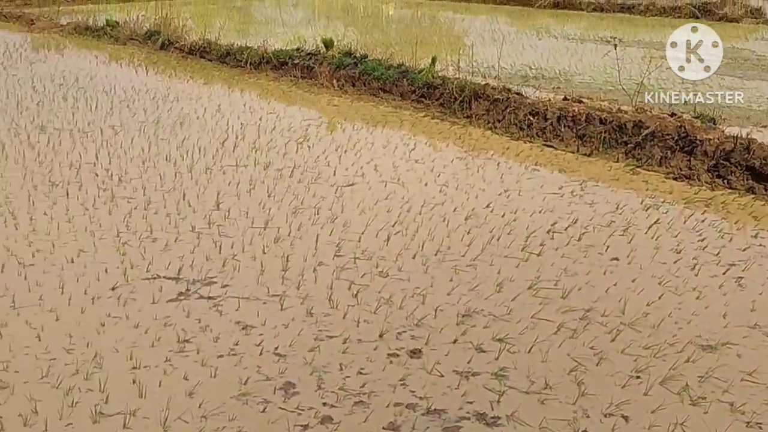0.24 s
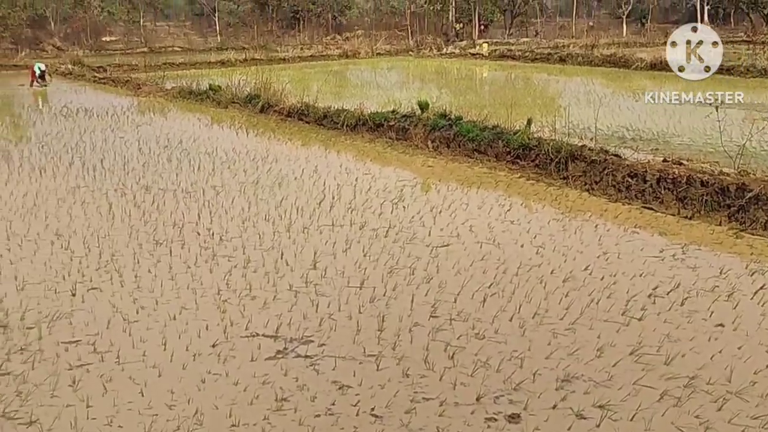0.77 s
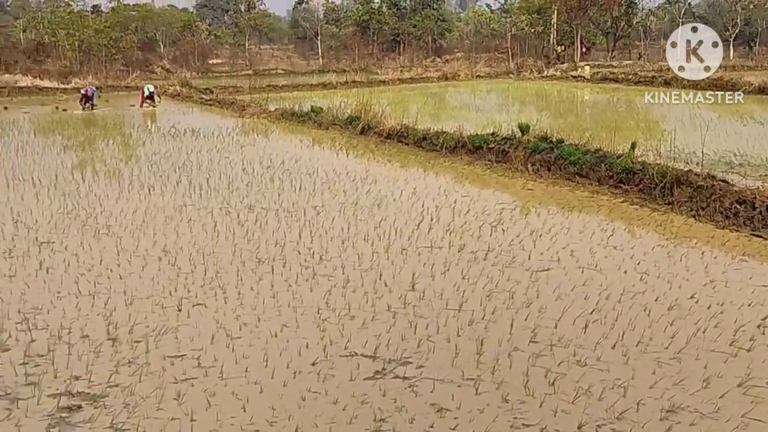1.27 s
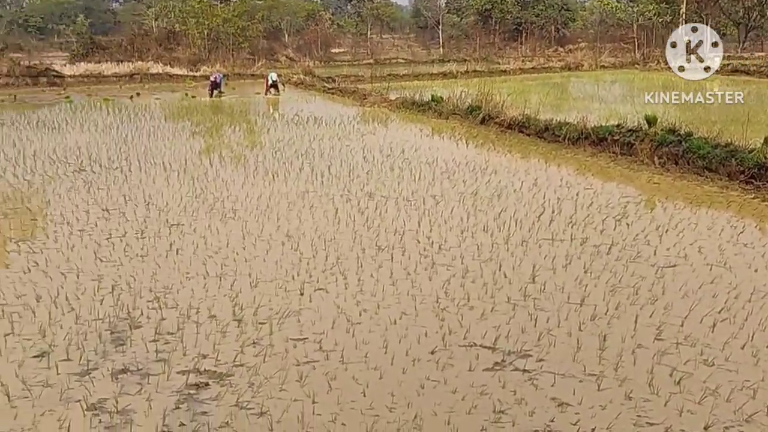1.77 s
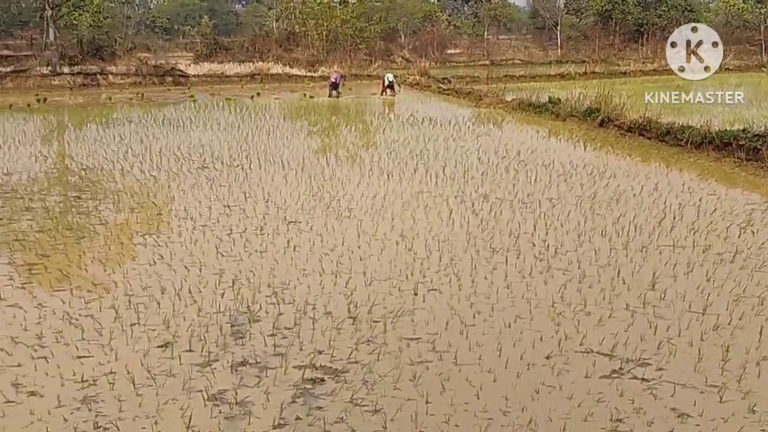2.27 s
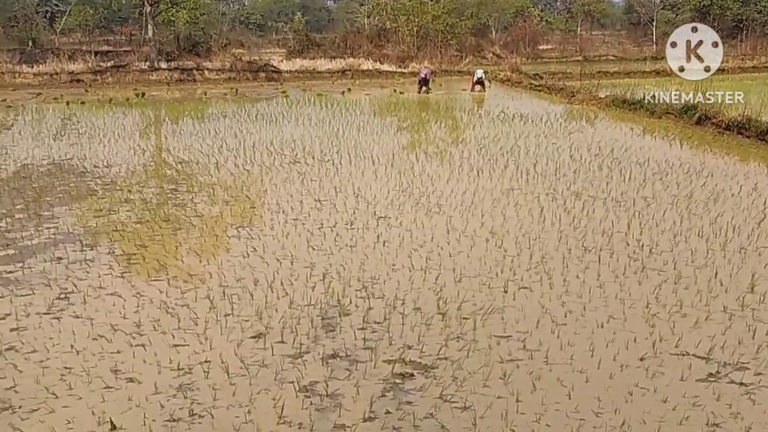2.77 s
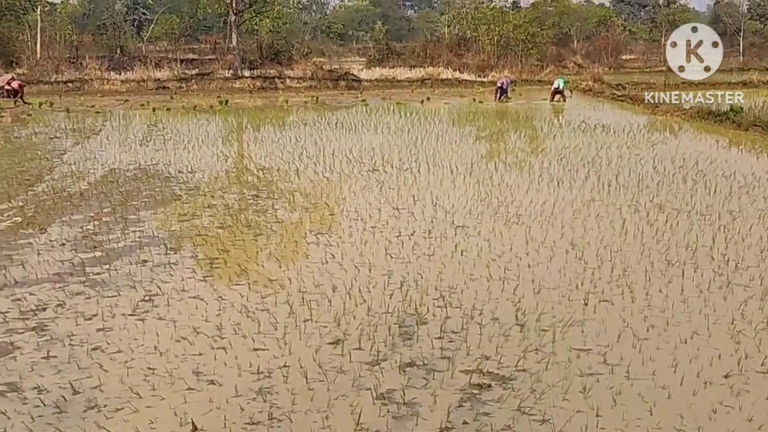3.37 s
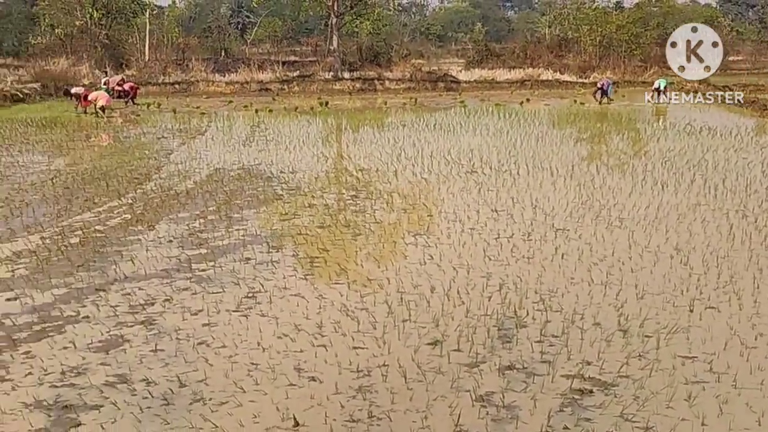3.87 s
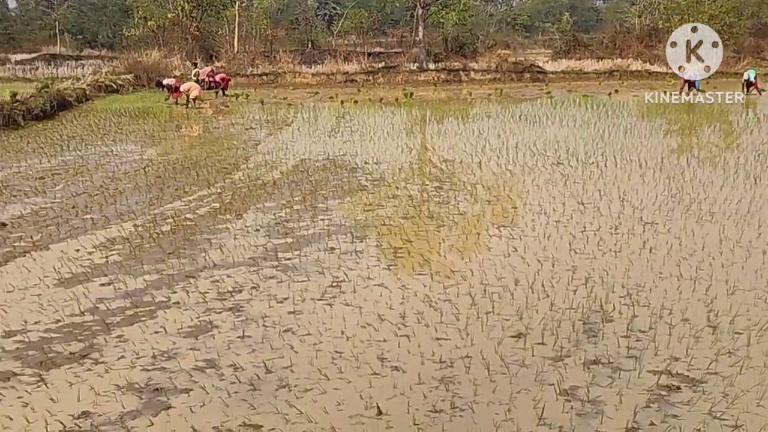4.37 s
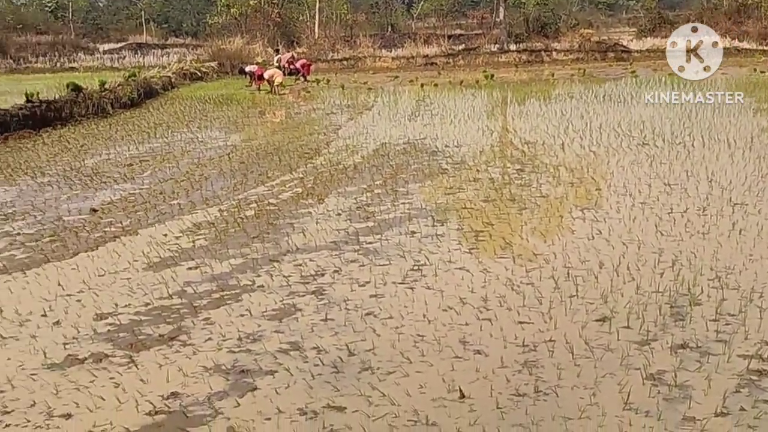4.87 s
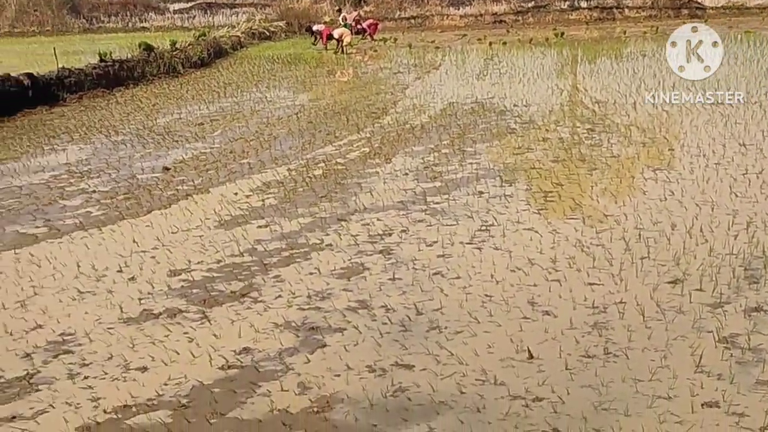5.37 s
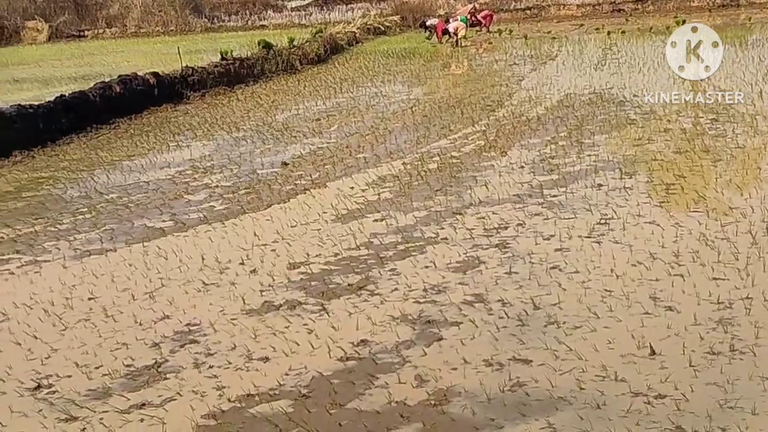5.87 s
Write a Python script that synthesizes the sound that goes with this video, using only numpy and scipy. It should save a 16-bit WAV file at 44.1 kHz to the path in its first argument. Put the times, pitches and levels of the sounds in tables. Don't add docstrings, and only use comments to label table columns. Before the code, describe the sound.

Across a flooded field a small single-cylinder engine putters steadily, about fourteen beats a second, dull and distant at first, then gradually fuller and brighter with metallic clatter towards the right. Light wind buffets and airy hiss surround it. Fingers tick on the handheld stereo phone, most sharply near three seconds; a rough bird note comes mid-way, then a stick snaps close on the right just after four seconds.

```python
import sys
import numpy as np
from scipy import signal
from scipy.fft import next_fast_len
from scipy.io import wavfile
from scipy.ndimage import uniform_filter1d

SR = 44100
rng = np.random.default_rng(int(sys.argv[2]) if len(sys.argv) > 2 else 0)


def store_pcm(level_fs):
    pcm = np.round(np.clip(level_fs, -1, 1) * 32767).astype(np.int16)
    wavfile.write(sys.argv[1], SR, np.atleast_2d(pcm).T)


def boost(x):
    u = np.asarray(x, float) / 20
    return 10 ** u


N = 270333
T = np.arange(N) / SR

# (time [s], thump level [dB])
TURN = [(0, -58), (.4, -53.5), (1.2, -51), (2, -49.5), (3.4, -49.5), (3.8, -48), (4.6, -48), (5.4, -49.5),
        (5.8, -48), (6.13, -48)]
# (time [s], facing [0-1])
FACING = [(0, 0), (1, 0.11), (1.6, 0.3), (2.2, 0.54), (2.8, 0.67), (3.5, 0.66), (4.3, 0.94), (5, 1),
          (6.13, 0.99)]


def evened(x):
    return x / np.sqrt(np.mean(x ** 2) + 1e-20)


def columns(rows, t):
    s, *values = np.transpose(rows)
    return [np.interp(t, s, v) for v in values]


def on_log(rows, hz):
    return columns([(np.log(f), *v) for f, *v in rows], np.log(hz + 1e-3))


def add(mix, s, sound):
    part = mix[..., round(s * SR):][..., :sound.shape[-1]]
    part += sound[..., :part.shape[-1]]


def filtered(x, order, hz, kind):
    return signal.sosfilt(signal.butter(order, hz, kind, fs=SR, output="sos"), x)


def resonate(x, hz, width):
    return signal.lfilter(*signal.iirpeak(hz, hz / width, SR), x)


def resonate_twice(x, hz, width, second_width):
    return resonate(resonate(x, hz, width), hz, second_width)


def burst(s, rise, fall):
    s = np.maximum(s, 0)
    return (1 - np.exp(-s / rise)) * np.exp(-s / fall)


def bump(s, half):
    return np.exp(-((T - s) / half) ** 2)


def waver(n, size):
    return evened(uniform_filter1d(uniform_filter1d(rng.standard_normal(n), size), size))


def noise(spectrum, patchy_db, size):
    a, b, patches = rng.standard_normal((3, 2, N // 128 + 5, 257)).swapaxes(2, 3)
    patches = uniform_filter1d(patches, size, axis=1)
    patches = evened(uniform_filter1d(patches, 20, axis=2))
    colour_db = on_log(spectrum, np.fft.rfftfreq(512, 1 / SR))[0][:, None]
    z = (a + 1j * b) * boost(colour_db + patchy_db * patches)
    return evened(signal.istft(z, nperseg=512, noverlap=384)[1][:, :N])


def knocks(rows, rise, grain):
    out, t = np.zeros(N), T[:8000]
    for s, db, hz, t60, width in rows:
        grit = evened(resonate_twice(rng.standard_normal(len(t)), hz, width, 2 * width))
        ring = np.sin(2 * np.pi * hz * t) + grain * grit
        add(out, s, boost(db - 60 * t / t60) * (1 - np.exp(-t / rise)) * ring)
    return out


def bird(note, overtones_db, rough, hold):
    start, length, peak_db, first_hz, last_hz = note
    u = np.arange(0, length, 1 / SR) / length
    db = peak_db - 14 * abs(2 * u - 1) ** hold + 2.5 * waver(len(u), 500)
    hz = first_hz + (last_hz - first_hz) * u
    roughness = evened(uniform_filter1d(rng.standard_normal(len(u)), 90))
    turns = np.cumsum(hz * (1 + rough * roughness)) / SR
    out = np.zeros(N)
    add(out, start, sum(boost(db + o) * np.sin(2 * np.pi * k * turns) for k, o in enumerate(overtones_db, 1)))
    return out


def exhaust(firings, thump_luck, ring_luck):
    # (delay [s], level [dB])
    banks = [(0.022, -16), (.042, -18.5), (0.059, -16)]
    # (frequency [Hz], width [Hz], level against the thump [dB])
    pipe_modes = [(354.5, 26.3, -13.5), (449.7, 35.3, -13), (543.6, 36, -18.5), (250, 120, -24),
                  (123.9, 9.5, -12.5)]
    at = np.round(firings * SR).astype(int)
    train, ring_train = np.zeros((2, N))
    train[at] = boost(0.61 * thump_luck)
    ring_train[at] = train[at] * boost(3 * ring_luck)

    u = np.arange(-882, 883) / SR
    wave = np.exp(-((u + .0015) / .006) ** 2) * np.cos(2 * np.pi * (109 * u - 1500 * u ** 2))
    direct = signal.oaconvolve(train, wave, "same")
    thump = evened(direct + sum(boost(db) * np.roll(direct, round(late * SR)) for late, db in banks))

    flow = .7 * evened(ring_train) + rng.standard_normal(N)
    silencer = boost(-13) * evened(resonate_twice(flow, 100, 20, 90))

    gas = evened(np.roll(train, -330)) + rng.standard_normal(N)
    pipe = sum(boost(db) * evened(resonate_twice(gas, hz, width, 3 * width)) for hz, width, db in pipe_modes)
    return thump + silencer + pipe


def casing(firings, knock_luck, puff_luck):
    # (frequency [Hz], width [Hz], level at facing 0, 1/3, 2/3 and 1 [dB] x4, puff against knock [dB])
    casing_modes = [(771.3, 247, -10, -9.5, -11.5, -9, -14), (1008.4, 120, 2, 2, -1.5, 0, -6.5),
                    (1311, 124, -7, -4.5, -2.5, -1, -7.5), (1570, 62, -18.5, -4.5, -4.5, -6, 5),
                    (1950, 85, -16.5, -11.5, 0, -4, -3.5), (2145, 50, -12, -22, -5, 0, -4),
                    (2406, 46, -21, -20, -8.5, -5, -3.5), (2634, 71, -16, -16.5, -9, -3.5, -5),
                    (2976, 94, -12.5, -17.5, -15.5, -7.5, 0.5), (3194, 210, -23.5, -16, -20.5, -19, -4),
                    (3602, 135, -38, -15.5, -19.5, -12, 6.5), (4130, 930, -80, -35, -36, -24, 11)]
    which = np.clip(np.searchsorted(firings - .03, T) - 1, 0, None)
    since = T - firings[which]
    knock, puff = burst(since + .025, .006, .005), burst(since + .0095, .004, .003)
    clatter = 0.064 + 0.087 * burst(since + .02, 0.0065, 0.038)
    facing = columns(FACING, T)[0]
    detune_luck = rng.standard_normal(len(firings))
    out = np.zeros(N)
    for (hz, width, *aim_db, puff_db), k_luck, p_luck in zip(casing_modes, knock_luck, puff_luck):
        drive = knock * boost(1.8 * k_luck[which]) + clatter
        drive = drive + puff * boost(puff_db + 6.4 * p_luck[which].clip(-2, 1.4))
        habit = .2 * (hz < 1200) * knock * np.sin(2 * np.pi * hz * since)
        ring = resonate_twice(drive * rng.standard_normal(N) + habit, hz, width, 4 * width)
        off_hz = hz * .025 * (hz > 1200) * detune_luck[which] * np.sign(k_luck[which])
        analytic = signal.hilbert(ring, next_fast_len(N))[:N]
        ring = (analytic * np.exp(2j * np.pi * np.cumsum(off_hz) / SR)).real
        out += boost(np.interp(facing, np.linspace(0, 1, len(aim_db)), aim_db)) * evened(ring)
    return out


def engine():
    # (time [s], firing rate [1/s])
    governor = [(0, 14.337), (1, 14.218), (1.7, 14.035), (2, 13.94), (2.7, 13.814), (3.3, 14.08),
                (4.3, 14.027), (4.8, 13.892), (5.4, 14.014), (6.13, 13.823)]
    modes = 12
    crank = .354 + np.cumsum(columns(governor, T)[0]) / SR
    firings = T[1:][np.diff(np.floor(crank)) > 0]
    knock_luck, puff_luck = rng.standard_normal((2, modes, len(firings)))
    thump_luck = rng.standard_normal(len(firings))

    thump_db = columns(TURN, T)[0]
    rock_db = 1.5 * np.cos(2 * np.pi * (T - 1.06) / 2.71)
    casing_db = -60.5 + 0.49 * (thump_db + 50) + rock_db
    thumps = boost(thump_db - 1.5) * exhaust(firings, thump_luck, puff_luck[-1])
    return thumps + boost(casing_db) * casing(firings, knock_luck, puff_luck)


def wash():
    # (frequency [Hz], density [dB per Hz])
    wash_colour = [(29, -46), (50, -7), (117, -3), (161, -17), (234, -26), (354, -14), (659, -24.5),
                   (1020, -24.5), (1160, -35), (1370, -28.5), (1720, -30), (2560, -30.5), (4500, -64),
                   (5850, -94), (9900, -120)]
    wash_db = -61 + 0.71 * (columns(TURN, T)[0] + 53.5)
    near, far = boost(wash_db) * noise(wash_colour, patchy_db=2.7, size=8)
    return near, filtered(far, 1, 400, "high")


def ports(x):
    # (frequency [Hz], level turned away [dB], level facing [dB])
    shade = [(95, 2, 0.56), (510, -1, 1.5), (800, -11.5, 1), (1310, -10.5, -13.5), (1980, -7, -17),
             (2840, -10, -48), (3200, -4.5, -28), (4400, 11.5, -9)]
    # (frequency [Hz], phase turned away [rad], phase facing [rad])
    lag_curve = [(20, .05, 0), (120, .27, .07), (400, 1, .6), (800, 2.3, 1.9), (1500, 2.9, 1.5),
                 (2200, 4.5, 2.3), (4000, 6, 2)]
    hz, t, z = signal.stft(x, SR, nperseg=256)
    facing = columns(FACING, t)[0]

    def turned(curve):
        away, towards = on_log(curve, hz)
        return away[:, None] + facing * (towards - away)[:, None]

    left = z * boost(turned(shade)) * np.exp(-1j * turned(lag_curve))
    return np.array([signal.istft(left, SR, nperseg=256)[1][:N], x])


def hiss():
    # (frequency [Hz], density [dB per Hz])
    hiss_colour = [(2350, 3), (4000, -0.5), (4930, -4.5), (6550, -6), (8180, -3), (10300, -4), (13000, -5),
                   (14600, -5.5), (15500, -13)]
    # (time [s], swell [dB], half-length [s])
    rustles = [(1.4, 3.5, 0.24), (1.996, 3, 0.17), (3.156, 5.5, 0.19), (3.715, 5.5, 0.12),
               (4.562, 5.5, 0.48), (5.465, 5.5, 0.26), (6.092, 6, .25)]
    hiss_db = -78 + 0.53 * (columns(TURN, T)[0] + 50) + 1.5 * waver(N, 900)
    hiss_db = hiss_db + sum(db * bump(s, half) for s, db, half in rustles)
    pair = noise(hiss_colour, patchy_db=3.6, size=2)
    pair = pair - [[.03], [0]] * pair[1]
    return boost(hiss_db) * pair * boost([[-2.5], [2.1]])


def wind():
    # (time [s], peak level [dB])
    gusts = [(.05, -52.5), (.25, -54), (0.479, -50.5), (.93, -58), (1.419, -53), (2.4, -63), (3.1, -63),
             (3.8, -59), (4.3, -69), (4.65, -68), (4.79, -45), (4.97, -54), (5.24, -61), (5.45, -64),
             (5.64, -56)]
    lumps = filtered(rng.standard_normal((2, N)), 3, [36, 62], "band")
    lumps = evened(lumps + .3 * lumps[::-1])
    strength = boost(-69.5) + sum(boost(db) * bump(s, 0.081) for s, db in gusts)
    return strength * boost(-7.0) * lumps * boost([[1.5], [-1.5]])


def ticks():
    # (time [s], peak level [dB], frequency [Hz], left over right [dB])
    tick_list = [(0.1989, -62.5, 8200, -12), (0.205, -63, 12500, -12), (0.721, -57, 8500, -5),
                 (1.121, -64.5, 8230, 7), (1.4122, -61, 4970, -6), (1.7255, -70, 9820, -10),
                 (1.7938, -68, 13800, -16), (1.8213, -67, 10530, -19), (2.8647, -65, 6060, -2),
                 (2.9543, -66, 10600, 0), (3.0932, -63, 6550, -15), (3.1265, -50, 6380, -12),
                 (3.129, -51, 13900, -12), (3.1326, -42.5, 9500, -13.5), (3.3334, -64, 8740, -13),
                 (3.5154, -67, 7000, -9), (3.6363, -59, 6020, -6), (3.696, -64, 8000, -6),
                 (4.0731, -60, 9970, -12), (4.2423, -68, 13500, -13), (4.282, -70, 7050, 4),
                 (4.352, -61, 13500, -9), (4.3548, -54, 8900, -8), (4.5176, -59, 9080, -8),
                 (4.9636, -61, 5980, -12), (5.0958, -68, 8550, 5), (5.3068, -74, 6650, -27),
                 (5.4799, -57, 9200, -12)]
    t60, rise, width_hz = 0.053, .002, 2460
    out, t = np.zeros((2, N)), T[:5000]
    for s, db, hz, pan_db in tick_list:
        grit = rng.standard_normal((2, len(t)))
        grit = grit - .5 * grit[1]
        puff = resonate_twice(grit, hz, width_hz, width_hz + 500) + 0.24 * grit
        puff = evened(filtered(puff, 4, 4000, "high"))
        envelope = boost(db - 2.5 - 60 * t / t60) * (1 - np.exp(-t / rise))
        add(out, s, envelope * puff * boost([[pan_db / 2], [-pan_db / 2]]))
    return out


def panel():
    # (time [s], peak level [dB], frequency [Hz])
    rattles = [(0.3844, -65, 2860), (0.8053, -60, 3010), (1.0191, -60, 3050), (1.2883, -49, 1470),
               (1.5833, -54, 3280), (1.726, -53, 1620), (2.014, -48, 1592), (2.156, -43, 1570),
               (2.8045, -40, 1960), (3.022, -39.5, 1950), (3.2345, -44.5, 2110), (3.8591, -56, 2100),
               (4.6613, -47, 2000), (4.7335, -43, 1900), (5.092, -42.5, 1566), (5.2359, -43, 2420),
               (5.7344, -44, 1495), (5.8087, -38.5, 2180), (5.879, -38, 2560), (6.0207, -52, 1590),
               (6.094, -36, 1593)]
    t60, width_hz = 0.061, 68
    return boost(1.5) * knocks([(*row, t60, width_hz) for row in rattles], rise=0.0017, grain=0.42)


def whistling_bird():
    # (start [s], length [s], peak level [dB], first pitch [Hz], last pitch [Hz])
    chirp_note = (1.235, .09, -71, 2390, 2170)
    whistle_note = (3.748, .14, -67, 3388, 3372)
    chirp = bird(chirp_note, overtones_db=(0.1,), rough=.003, hold=3.2)
    whistle = bird(whistle_note, overtones_db=(0.1,), rough=.007, hold=5)
    return (chirp + whistle) * boost([[-9], [3]])


def snap():
    # (time [s], peak level [dB], frequency [Hz], t60 [s], width of the grain [Hz])
    cracks = [(4.3518, -28, 1950, 0.018, 250), (4.3525, -38, 2610, 0.069, 300),
              (4.358, -29.5, 2213, 0.062, 205), (4.365, -34.5, 3272, 0.051, 258),
              (4.372, -52, 2450, 0.34, 1150), (4.3515, -43, 240, 0.075, 120), (4.354, -47, 870, 0.06, 300),
              (4.962, -55, 3750, 0.083, 300), (4.988, -46.5, 3570, 0.042, 300),
              (1.373, -45, 800, 0.039, 500), (3.62, -60.5, 245, 0.39, 60)]
    return knocks(cracks, rise=0.00033, grain=0.91)


def squawking_bird():
    # (start [s], length [s], peak level [dB], first pitch [Hz], last pitch [Hz])
    squawk_note = (3.61, .1, -57, 825, 765)
    # (frequency [Hz], level [dB], width [Hz])
    breath = [(2350, -61, 120), (2080, -60, 140), (2800, -68, 150), (1650, -64, 150), (1250, -63, 250)]
    start, t60 = 3.607, 0.29
    voice = bird(squawk_note, overtones_db=(0.1, -3, -1.5, -20), rough=.022, hold=1.5)
    rasp = knocks([(start, db, hz, t60, width) for hz, db, width in breath], rise=.03, grain=4)
    return voice * boost([[-1.5], [1.5]]) + rasp * boost([[-4], [1.5]])


def insect():
    start, end, edge = 4.35, 5.7, .15
    singing = np.clip(np.minimum(T - start, end - T) / edge + 1, 0, 1)
    song = evened(resonate_twice(rng.standard_normal(N), 8720, 200, 300))
    return singing * boost(-96.5 + 3 * waver(N, 900)) * song


def scene():
    near, far = wash()
    right_side = engine() + near + panel() + snap()
    right_side = filtered(right_side, 3, 4100, "low")
    field = ports(right_side) + far * boost([[-2.5], [-6]])
    animals = whistling_bird() + squawking_bird() + insect()
    return field + hiss() + wind() + ticks() + animals


def band_limit(x):
    return signal.sosfilt(signal.butter(12, 15600, fs=SR, output="sos"), x)


def record(dry):
    mic = filtered(dry, 1, 25, "high")
    mic = signal.sosfilt(signal.cheby2(12, 50, 16150, fs=SR, output="sos"), mic)
    return band_limit(mic)


dry = scene()
out = record(dry)
store_pcm(out)
```